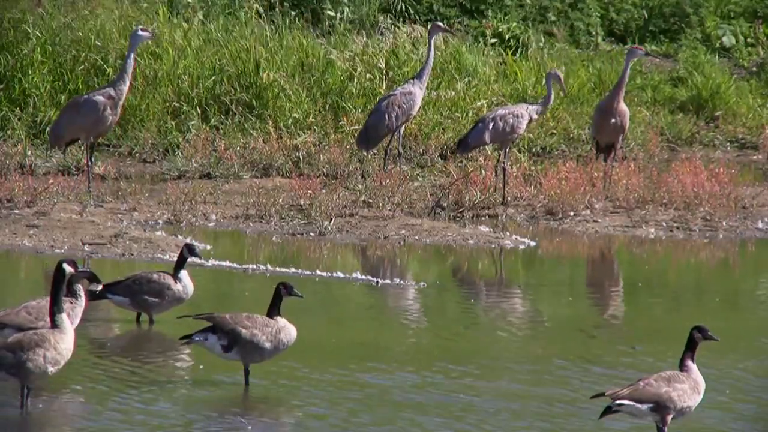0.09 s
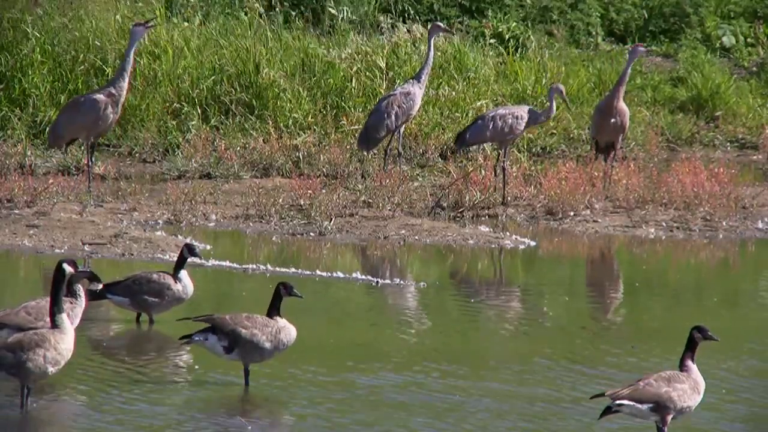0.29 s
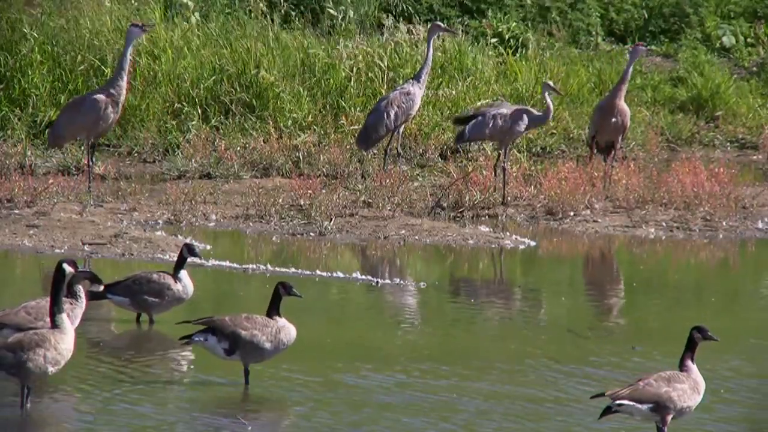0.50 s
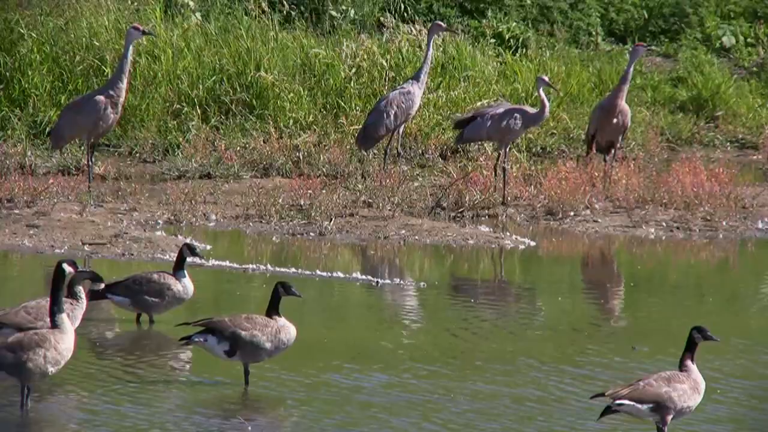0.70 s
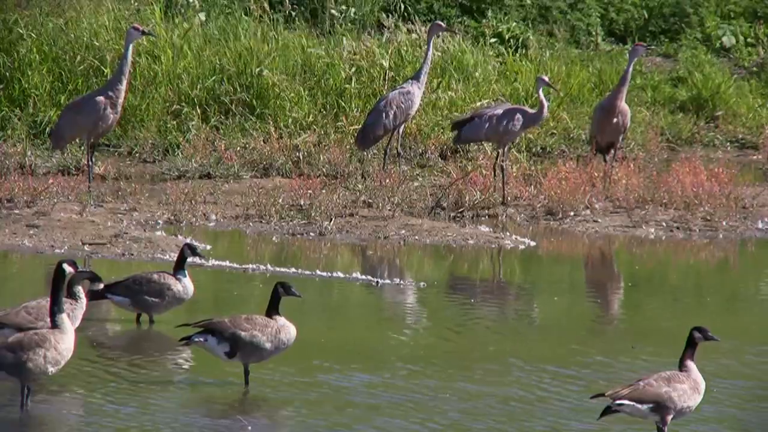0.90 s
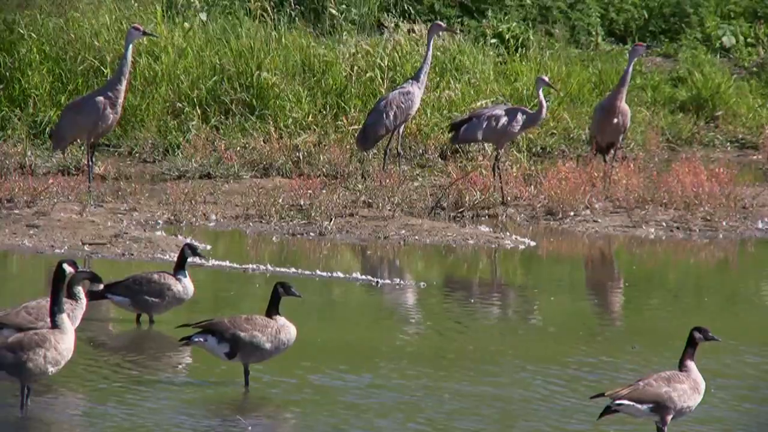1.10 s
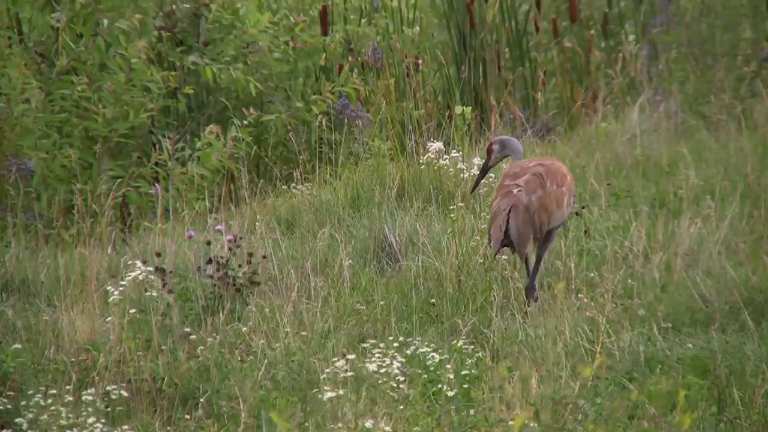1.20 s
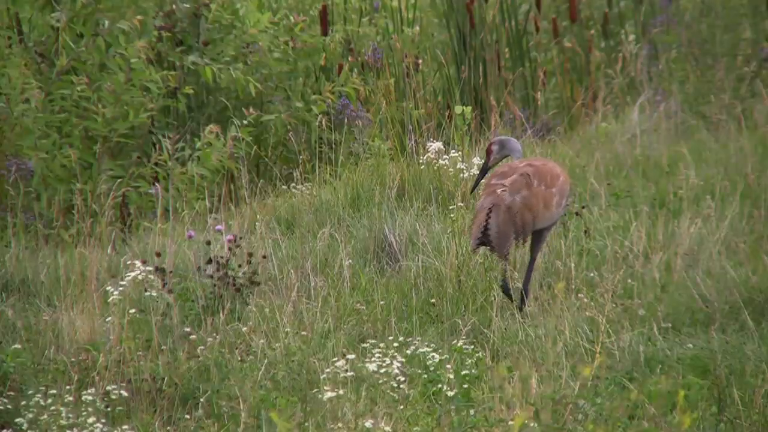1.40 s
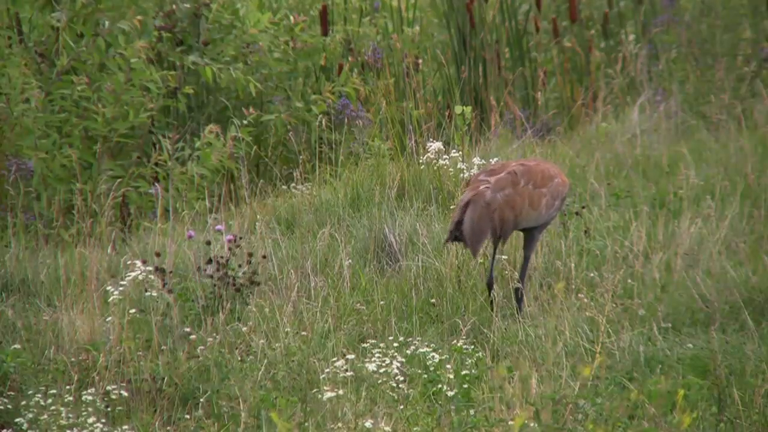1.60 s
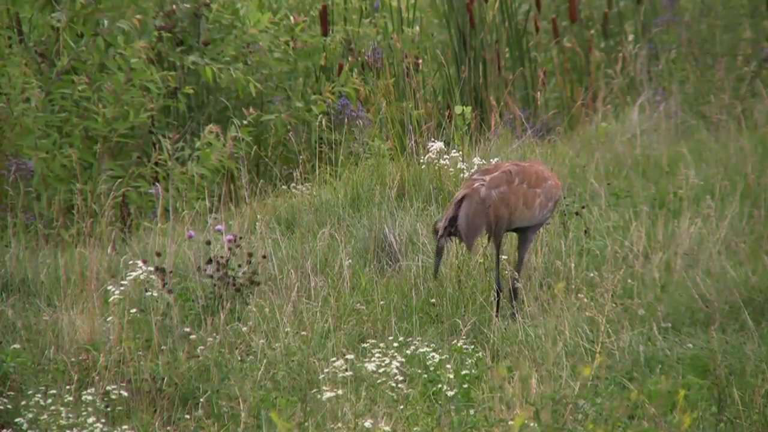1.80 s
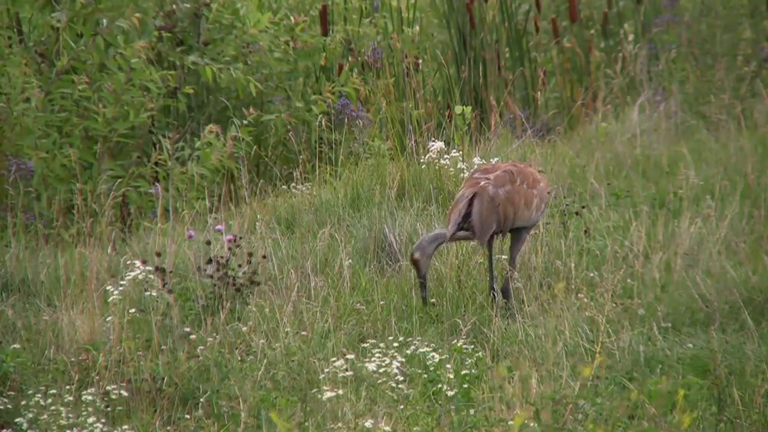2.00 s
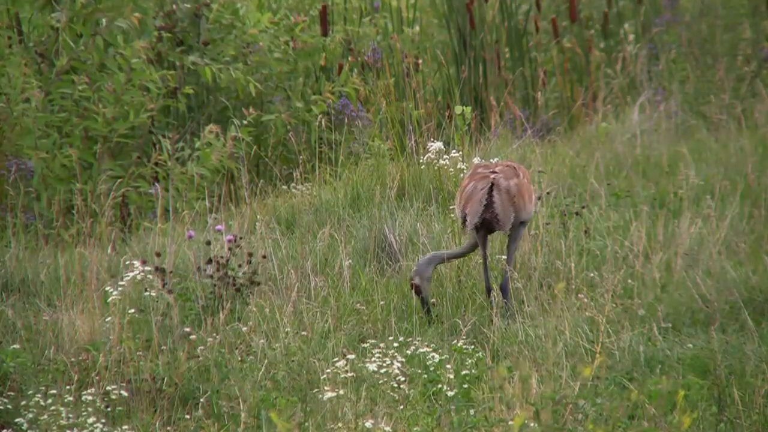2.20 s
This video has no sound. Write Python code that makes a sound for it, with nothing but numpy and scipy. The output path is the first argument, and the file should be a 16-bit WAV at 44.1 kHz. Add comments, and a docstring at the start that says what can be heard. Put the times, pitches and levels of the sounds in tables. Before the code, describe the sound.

Crane calls in an open pond meadow, clear and nearly dry. Faint peeps, cricket hiss and low background noise run from the start. A short nasal honk at 0.2 seconds, then a rolling, hoarse rattle of overlapping voices from 0.32, with a fainter honk beneath, fading by 1.1. The low noise drops; a katydid ticks from 0.95, with a buzzy twitter at 1.3 and soft bird whistles until the end.

```python
"""Cranes at a pond. Peeps, cricket hiss and a low background noise run from the start: gliding tones, shaped noise.
A short nasal honk (partials mixed with noise) is followed by a fainter one, under a rattle of three voices:
quick, hoarse, falling notes, each a few harmonics and noise passed through resonances.
As the rattle dies away a katydid starts to tick (noise gated by wing teeth) and the low noise drops.
Songbird slurs and whistles come and go, with one buzzy twitter; most of the whistles follow the rattle."""
import sys
import numpy as np
from scipy import signal
from scipy.fft import rfft, irfft, next_fast_len
from scipy.io import wavfile
from scipy.ndimage import map_coordinates

SR = 44100
rng = np.random.default_rng(int(sys.argv[2]) if len(sys.argv) > 2 else 0)


def digitize_waveform(pressure):
    """Quantize a signal to 16-bit integers and store it at the path in sys.argv[1].

    Rows of a 2-D input are taken as channels; values are limited to [-1, 1].
    """
    field = np.atleast_2d(pressure).T
    bounded = np.clip(field, -1, 1)
    quanta = np.round(bounded * 32767).astype(np.int16)
    wavfile.write(sys.argv[1], SR, quanta)


N = 97020
T = np.arange(N) / SR  # s


def amp(db):
    """Amplitude ratio of a level in dB."""
    return 10 ** (np.asarray(db) / 20)


def unit(x):
    """x scaled to rms 1."""
    return x / np.sqrt(np.mean(x ** 2) + 1e-20)


def along(points, hz):
    """Interpolate (f/Hz, value) points on a log frequency axis."""
    f, v = np.transpose(points)
    return np.interp(np.log(hz + 1), np.log(f + 1), v)


def curves(rows):
    """One value per sample for each column after the time."""
    s, *cols = np.transpose(rows)
    return [np.interp(T, s, c) for c in cols]


def wobble(knots_per_s):
    """Smooth random curve through normally distributed knots."""
    return map_coordinates(rng.standard_normal(N // 8), [T * knots_per_s], mode="wrap")


def filtered(x, response):
    """x times a response of frequency."""
    m = next_fast_len(N + SR // 2)
    hz = np.fft.rfftfreq(m, 1 / SR)
    return irfft(rfft(x, m) * response(hz), m)[..., :N]


def noise(spectrum):
    """Coloured noise of rms 1."""
    return unit(filtered(rng.standard_normal(N), lambda hz: amp(along(spectrum, hz))))


def ring(x, spectrum):
    """x through minimum-phase resonances of the given (f/Hz, level/dB) shape, which ring on after it."""
    m = next_fast_len(N + SR // 2)
    log_gain = np.log(amp(along(spectrum, np.fft.rfftfreq(m, 1 / SR))))
    cepstrum = irfft(log_gain, m)
    causal = cepstrum * (1 + np.sign(np.fft.fftfreq(m)))  # folding makes it causal
    return irfft(rfft(x, m) * np.exp(rfft(causal)), m)[:N]


def glide_phase(hz):
    """Phase in radians of a pitch track."""
    return 2 * np.pi * np.cumsum(hz) / SR


def add(track, s, sound):
    """Mix a sound in at time s, or at the start if s is negative."""
    part = track[max(round(s * SR), 0):][:len(sound)]
    part += sound[:len(part)]


def echo(x, t60_s):
    """Stereo scatter from the reeds and the bank: decaying noise with a soft onset."""
    t = T[:SR // 2]
    decay = amp(-60 * t / t60_s) * (1 - np.exp(-t / 0.0035))
    tail = rng.standard_normal((2, len(t))) * decay
    return signal.fftconvolve(np.atleast_2d(x), tail / np.linalg.norm(tail[0]), axes=1)[:, :N]


def rattle(notes, throat, sag_per_s, scoop, fade_s, rasp_db):
    """One voice: notes scoop up, throb and fall, sweeping their partials through the windpipe's resonances."""
    # breathy turbulence: f/Hz, level/dB
    rasp = [(110, -34.5), (260, -10), (500, -10.5), (720, 11), (1050, 21), (1400, 4.5), (1740, 9),
            (2200, 3), (2550, 3), (2750, -4.5), (3800, -2), (5500, -8.5), (7000, -23), (15000, -25)]
    attack_s, release_s = 0.0062, 0.0038  # release: time to fall to 1/e
    flutter_hz, flutter_depth, scoop_s = 108, 0.056, 0.0044
    jitter_depth, grit_depth, rough_knots_per_s = 0.038, 0.5, 601.8  # of pitch, of overtones
    voice, breath, t = np.zeros(N), np.zeros(N), T[:SR // 16]
    turbulence = rng.standard_normal(N)
    jitter, grit = wobble(rough_knots_per_s), wobble(rough_knots_per_s)
    for s, length_s, hz, db, overtones_db in notes:
        now = slice(round(s * SR), round(s * SR) + len(t))
        pitch_hz = hz * np.exp(-sag_per_s * t) * (1 - scoop * np.exp(-t / scoop_s))
        phase = glide_phase(pitch_hz * (1 + jitter_depth * jitter[now]))
        attack = np.sin(np.pi / 2 * np.minimum(t / attack_s, 1)) ** 2
        release = 1 / (1 + np.exp((t - length_s) / release_s * 2)) ** .5
        throb = 1 + flutter_depth * np.cos(2 * np.pi * flutter_hz * (t - attack_s))
        env = attack * release * throb * amp(db) * np.exp(-t / fade_s)
        overtones = amp(overtones_db) * sum(np.sin(k * phase) for k in range(2, 6))
        add(voice, s, env * (np.sin(phase) + overtones * (1 + grit_depth * grit[now])))
        add(breath, s, env * turbulence[now] * (1 + .5 * np.cos(phase)))  # breath pulses with the pitch
    return np.sqrt(2) * (ring(voice, throat) + amp(rasp_db) * ring(breath, rasp))


def crane_rattles():
    """Low, middle and high voices, each with its own long windpipe."""
    # rattle notes: t/s, length/s, f/Hz, relative level/dB, overtones/dB
    low_notes = [(.3205, .019, 951.6, -10, -2), (.340, .008, 861, -18.5, 3), (.391, .022, 983, -9.5, 0),
                 (.4535, .021, 971, -10.5, -1), (.5095, .021, 966, -11, 0.5), (.553, .016, 1055, -12.5, -4),
                 (.564, .018, 933, -9, -3.5), (.613, 0.019, 1027, -11.5, 2.5),
                 (.630, 0.015, 895, -10.5, -3), (.666, .018, 987, -11, 4.5), (.686, .022, 957, -14, -6),
                 (.7145, .022, 956, -13, -6.5), (.7445, .02, 968, -13, -1.5), (.763, .02, 864, -16.5, 2),
                 (.797, .025, 988, -13.5, -2.5), (.848, .024, 969, -15.5, 1), (.9, .021, 952, -16, 0),
                 (.9475, .022, 920, -16.5, -5.5), (.9965, .02, 883, -20, 1.5),
                 (1.049, 0.0073, 842, -26.5, 8)]
    middle_notes = [(.482, .02, 1312, -8, -12), (.7125, .022, 1291, -11, -1), (.766, .022, 1276, -13, 3),
                    (.816, .02, 1301, -13, -0.5), (.866, .023, 1279, -13, 0), (.949, .02, 1316, -23.5, -7),
                    (.998, .023, 1318, -16, -1), (1.0485, .02, 1281, -17, 0), (1.098, .023, 1246, -18, 0.5)]
    high_notes = [(.547, .016, 1400, -25.5, -1.3), (.604, .013, 1420, -23.5, 0.035),
                  (.660, .015, 1410, -25.5, 0), (.713, .01, 1400, -25.5, 0), (.782, .015, 1410, -25, -0.51),
                  (.840, .01, 1420, -26.5, 0), (.893, .014, 1420, -28.5, -0.69),
                  (.947, .008, 1370, -23, 0.17)]
    # windpipe resonances: f/Hz, level/dB
    low_throat = [(500, -10), (700, -2), (830, -2), (950, 0), (1350, -11.5), (1570, -19.5), (1660, -15),
                  (1750, -11.5), (1870, -29.5), (2000, -9.5), (2200, -28.5), (2450, -28), (2750, -34.5),
                  (2950, -24), (3250, -41.5), (3550, -36), (7000, -46)]
    middle_throat = [(600, -18), (880, -3), (985, 3), (1065, 0), (1150, -16), (1250, -6), (1400, -24),
                     (1650, -13), (1870, -33.5), (2050, -11), (2200, -25), (2390, -9), (2700, -35),
                     (3600, -31.5), (7000, -50.5)]
    high_throat = [(700, -11), (1270, 0.5), (1450, -6), (2250, -9), (2570, 0.5), (2800, -14.5), (3600, -22),
                   (3950, -4.5), (4300, -25.5), (7000, -47.5)]
    low = rattle(low_notes, low_throat, sag_per_s=11.5, scoop=.02, fade_s=0.037, rasp_db=-18.5)
    middle = rattle(middle_notes, middle_throat, sag_per_s=17, scoop=.06, fade_s=0.032, rasp_db=-17)
    high = rattle(high_notes, high_throat, sag_per_s=16, scoop=0.068, fade_s=.025, rasp_db=-15.5)
    return low + middle + high


def honk():
    """Two nasal calls: roughness trades harmonic partials for noise and shakes the pitch."""
    # course of the honks: t/s, f/Hz, level/dB, roughness (0-1)
    course = [(.165, 520, -110, 0.64), (.177, 537, -35, 0.9), (.205, 569.5, -27, 0.94),
              (.228, 571.4, -29, 0.04), (.258, 586.3, -24.5, 0.31), (.269, 557.6, -47, 0.7),
              (.31, 570, -65.5, 0.74), (.345, 520, -61.5, 0.93), (.375, 514.7, -34.5, 1),
              (.435, 580, -34, 0.6), (.485, 561.2, -33, 0.03), (.505, 585, -41.5, 0.4),
              (.53, 570, -120, 0.2)]
    # partials: multiple of the pitch, level/dB
    partials = [(1, -9), (2, -0.5), (3, 5), (4, -10), (5, -11), (6, -18.5), (7, -23.5)]
    # hoarse noise: f/Hz, level/dB
    hoarseness = [(240, -78), (400, -41), (532, -14.5), (1060, 5), (1160, -8.5), (1390, -34.5), (1720, -15),
                  (1870, -16), (2190, -16.5), (2540, -14.5), (2770, -28.5), (3110, -18), (3530, -31.5),
                  (3800, -18), (5000, -25.5), (6500, -71), (11000, -120)]
    hz, db, rough = curves(course)
    rough = np.clip(rough, 0, 1)
    phase = glide_phase(hz * (1 + 0.071 * rough * wobble(400)))
    tone = unit(sum(amp(level) * np.sin(round(k) * phase) for k, level in partials))
    return amp(db) * (np.sqrt(1 - rough ** 2) * tone + rough * noise(hoarseness))


def progress(length_s):
    """Runs from 0 to 1 over a note."""
    return np.linspace(0, 1, round(length_s * SR))


def arc(length_s, start_hz, middle_hz, end_hz):
    """Pitch track: a parabola through three values."""
    bend = np.polyfit([0, .5, 1], [start_hz, middle_hz, end_hz], 2)
    return np.polyval(bend, progress(length_s))


def whistle(hz, skew=1):
    """Pure note that swells and fades along a pitch track; skew over 1 puts its peak late."""
    u = np.linspace(0, 1, len(hz))
    swell = np.abs(np.sin(np.pi * u ** skew)) ** 0.9
    return swell * np.sin(glide_phase(hz))


def peeps():
    """Trills on two pitches; each peep is loudest late, as it turns down."""
    # trills: f/Hz, [(t/s, relative level/dB), ..]
    trills = [(4720, [(-.016, -32.5), (.022, -29.5), (.061, -30), (.416, -34), (.449, -31.5), (.488, -31),
              (.727, -34), (.763, -32), (1.028, -37), (1.056, -31), (1.093, -30.5), (1.513, -34.5),
              (1.546, -32), (1.579, -32), (1.783, -35), (1.818, -32.5), (1.857, -30.5), (2.155, -40),
              (2.188, -34.5)]), (5440, [(.128, -36.5), (.156, -36.5), (.190, -36), (.405, -42),
              (.431, -34.5), (.465, -36.5), (.744, -36.5), (.779, -40), (.968, -37), (.995, -34.5),
              (1.028, -35), (1.244, -38), (1.276, -39), (1.308, -37), (1.547, -36), (1.58, -33.5),
              (1.901, -44), (1.929, -36), (1.96, -34.5)])]
    # pitch ratio at start, middle, end
    shape = (1, 1.018, .915)
    out = np.zeros(N)
    for hz, trill in trills:
        for s, db in trill:
            track_hz = arc(.023, *(hz * np.array(shape)))
            add(out, s, amp(db - 2) * whistle(track_hz, skew=2))
    return out


def songbirds():
    """Short bent whistles and quivering downward slurs, as pure tones."""
    # whistles: t/s, length/s, start f/Hz, middle f/Hz, end f/Hz, relative level/dB
    whistles = [(0.196, 0.023, 5800, 6540, 7550, -46.5), (1.128, 0.096, 3754, 3133, 2740, -54),
                (1.73, .05, 5300, 5220, 5150, -55), (1.237, .04, 3890, 3500, 3050, -54.5),
                (1.388, .012, 3700, 3630, 3980, -48.5), (1.399, .008, 5400, 4700, 5300, -40.5),
                (1.403, .015, 6900, 6500, 7900, -41), (1.415, 0.013, 2900, 3250, 3370, -48),
                (1.613, .022, 3320, 2870, 2604, -47.5), (1.433, 0.085, 2733, 3234, 3370, -39),
                (1.631, 0.074, 2835, 3060, 3400, -41), (1.954, 0.019, 2184, 2974, 2148, -39),
                (2.041, 0.019, 2220, 2937, 2177, -39.5), (2.132, .02, 2270, 2910, 2250, -41.5)]
    # slurs: t/s, length/s, relative level/dB
    slurs = [(0.223, 0.09, -43), (0.694, .068, -37), (1.433, .088, -39)]
    # slur pitch: share of the note (0-1), f/Hz
    slur_pitch = [(0, 5500), (.18, 4930), (.58, 4760), (1, 4150)]
    waver_knots_per_s, waver_depth = 130, 0.004
    out = np.zeros(N)
    for s, length_s, start_hz, middle_hz, end_hz, db in whistles:
        add(out, s, np.sqrt(2) * amp(db) * whistle(arc(length_s, start_hz, middle_hz, end_hz)))
    for s, length_s, db in slurs:
        u = progress(length_s)
        quiver = 1 + waver_depth * wobble(waver_knots_per_s)[:len(u)]
        hz = np.interp(u, *np.transpose(slur_pitch)) * quiver
        add(out, s, np.sqrt(2) * amp(db) * whistle(hz))
    return out


def twitter():
    """One buzzy note: a falling pitch with a fast lopsided zigzag."""
    # note: t/s, length/s, start f/Hz, end f/Hz, relative level/dB
    note = (1.285, .031, 5750, 4800, -36)
    rate_hz, swing_hz = 165, 524
    out = np.zeros(N)
    s, length_s, start_hz, end_hz, db = note
    u = progress(length_s)
    zigzag = signal.sawtooth(2 * np.pi * rate_hz * length_s * (u - 1) - np.pi / 2, .25)
    hz = start_hz + (end_hz - start_hz) * u + swing_hz * zigzag
    add(out, s, np.sqrt(2) * amp(db) * whistle(hz))
    return out


def katydid():
    """Each wing stroke drags a few teeth over the scraper: decaying pulses of wing-coloured noise."""
    # ticks: t/s, relative level/dB
    ticks = [(.949, -42.5), (1.051, -50.5), (1.145, -44), (1.243, -43.5), (1.355, -45.5), (1.45, -43),
             (1.546, -43.5), (1.638, -43.5), (1.752, -41.5), (1.851, -42.5), (1.943, -43), (2.030, -44),
             (2.117, -43.5)]
    # wing resonance: f/Hz, level/dB
    wing = [(7000, -24), (9500, -9.5), (11000, -10), (12200, -1.5), (12900, -1), (14000, -5.5),
            (15000, -11), (16000, -23.5)]
    stroke_s, teeth_per_s, tooth_decay_s = 0.024, 324, 0.0016
    env, t = np.zeros(N), T[:round(stroke_s * SR)]
    for s, db in ticks:
        period_s = 1 / (teeth_per_s * (1 + 0.027 * rng.standard_normal()))
        teeth = np.exp(-(t % period_s) / tooth_decay_s)
        stroke = np.abs(np.sin(np.pi * t / stroke_s)) ** .4
        add(env, s, amp(db) * unit(teeth * stroke))
    return env * np.array([noise(wing), noise(wing)])


def meadow_hiss():
    """Steady shaped noise; the mid-side balance sets the left-right likeness by frequency."""
    # hiss: f/Hz, level/dB
    hiss = [(30, -28), (130, -43), (220, -32.5), (600, -29), (1200, -26), (1900, -26.5), (2500, -13),
            (3200, -11.5), (4000, -10), (4900, -8), (5800, -13), (6450, -9), (7000, -9), (7600, -4.5),
            (8500, -12.5), (9400, -25), (13000, -24.5), (15000, -20), (15800, -31.5)]
    # left-right likeness: f/Hz, correlation
    alike = [(40, 0.45), (300, 0.24), (2000, 0.82), (4000, 0.24), (8000, 0.01), (14000, 0.58)]

    def mid_side_gains(hz):
        turn = np.arccos(np.clip(along(alike, hz), -1, 1)) / 2
        return np.array([np.cos(turn), np.sin(turn)])

    mid, side = filtered(np.array([noise(hiss), noise(hiss)]), mid_side_gains)
    return amp(-47) * unit(np.array([mid + side, mid - side]))


def crickets():
    """Distant crickets as steady narrow bands of noise, independent left and right."""
    # bands: centre f/Hz, full width at half amplitude/Hz, relative level/dB
    bands = [(6290, 120, -56.5), (6540, 50, -57.5), (7520, 500, -54), (5720, 120, -65)]
    out = np.zeros((2, N))
    for centre_hz, width_hz, db in bands:
        band = filtered(rng.standard_normal((2, N)),
                        lambda hz: 1 / (1 + (2 * (hz - centre_hz) / width_hz) ** 4))
        out += amp(db) * unit(band)
    return out


def low_noise():
    """Low background noise: rumble, and a midrange rush that comes up early and cuts off at about 1.15 s."""
    # course: t/s, relative rumble level/dB, relative rush level/dB
    course = [(0, -59.5, -70), (.068, -61, -63), (.08, -57, -53.5), (.26, -57, -54), (.3, -71, -53),
              (1.13, -78, -55.5), (1.18, -87.5, -76), (2.2, -79.5, -74)]
    # rumble: f/Hz, level/dB
    rumble = [(20, -3), (60, 1), (150, -4.5), (220, -9), (500, -34)]
    # rush: f/Hz, level/dB
    rush = [(120, -25), (250, 1.5), (500, 0.5), (1200, -3.5), (2500, -13), (5000, -24.5)]
    rumble_db, rush_db = curves(course)
    side = amp(-18) * np.outer([1, -1], noise(rumble))  # differs from ear to ear
    return amp(rumble_db) * (noise(rumble) + side) + amp(rush_db) * noise(rush)


def scene():
    """Cranes straight ahead; the rest lies behind, slightly louder on the left than on the right."""
    # early echoes of the cranes: delay/s, level/dB
    bank = [(.0105, -16), (.020, -19.5)]
    crane_wet_db, bird_wet_db, tick_wet_db = -31, -8, -3
    calls = crane_rattles() + honk()
    cranes = calls + amp(crane_wet_db) * echo(calls, t60_s=.08)[0]
    for delay_s, db in bank:
        add(cranes, delay_s, amp(db) * calls)
    birds, ticks = peeps() + songbirds() + twitter(), katydid()
    insects = amp(-1.0) * (ticks + amp(tick_wet_db) * echo(ticks, t60_s=0.258))
    behind = birds + amp(bird_wet_db) * echo(birds, t60_s=.45) + insects
    behind = behind + meadow_hiss() + crickets() + low_noise()
    return cranes + behind * amp([[.6], [-.6]])  # left, right gain in dB


def record(dry):
    """Cut everything above the band limit and add a slight constant offset."""
    top_hz, offset = 15900, -.0032
    return filtered(dry, lambda hz: hz < top_hz) + offset


dry = scene()
out = record(dry)
digitize_waveform(out)
```